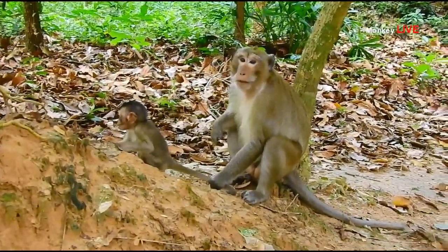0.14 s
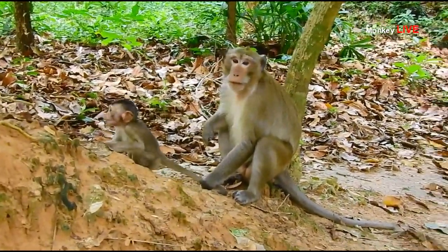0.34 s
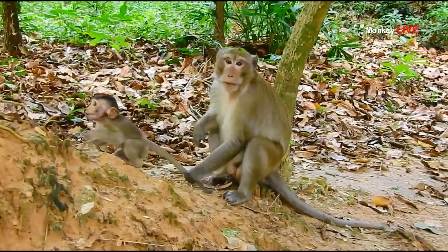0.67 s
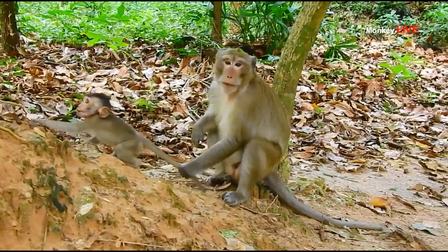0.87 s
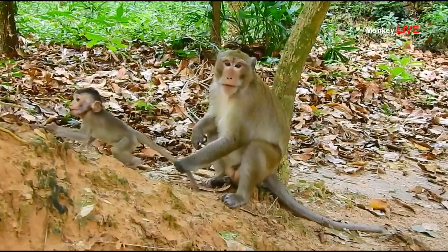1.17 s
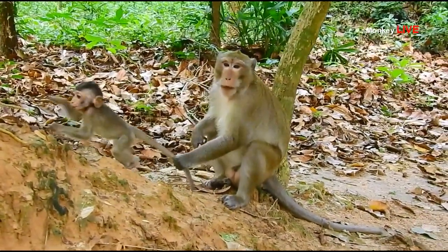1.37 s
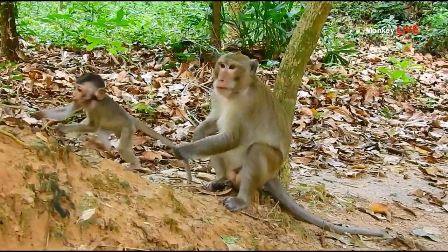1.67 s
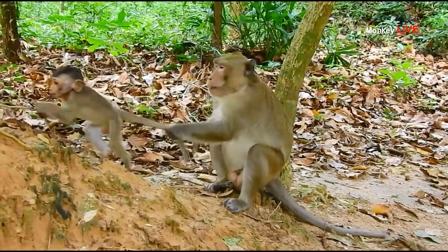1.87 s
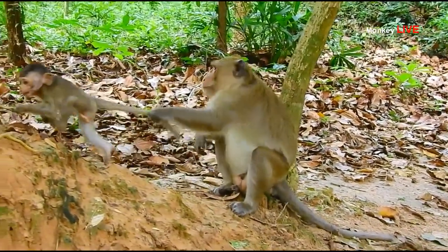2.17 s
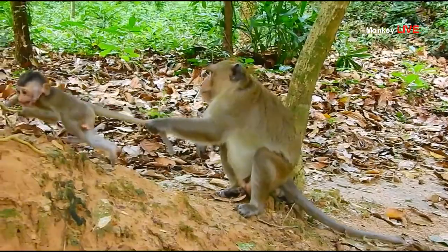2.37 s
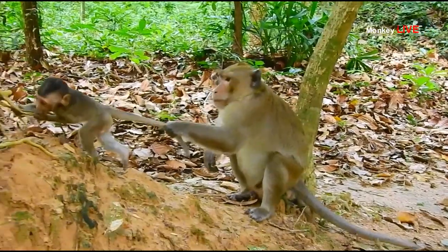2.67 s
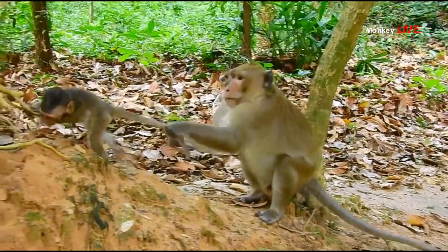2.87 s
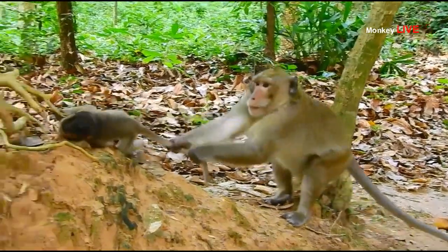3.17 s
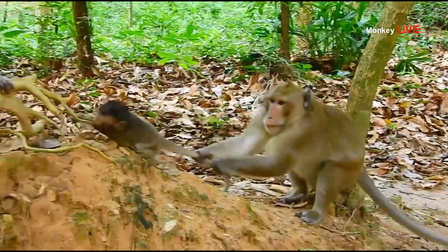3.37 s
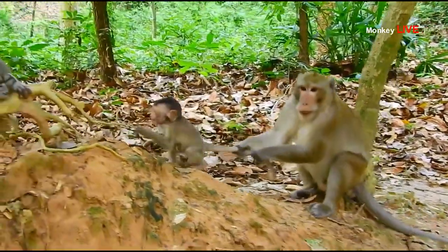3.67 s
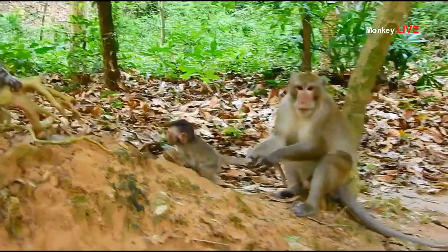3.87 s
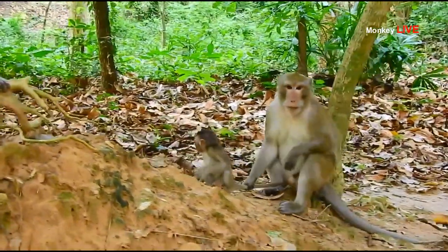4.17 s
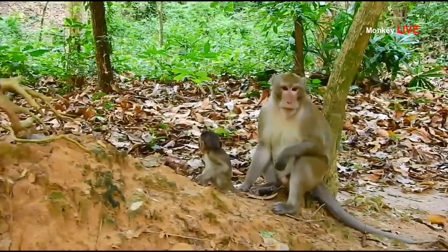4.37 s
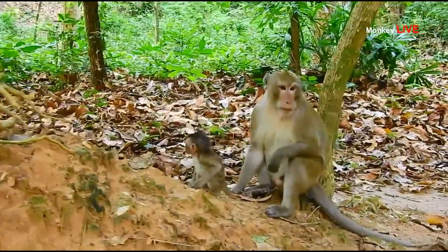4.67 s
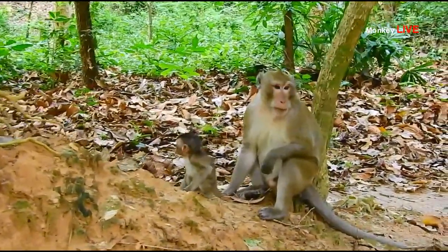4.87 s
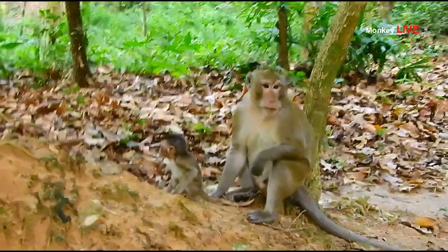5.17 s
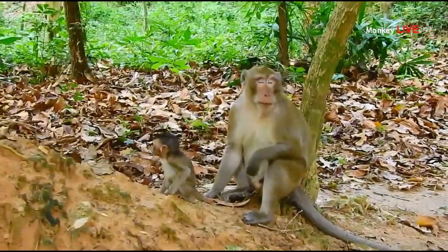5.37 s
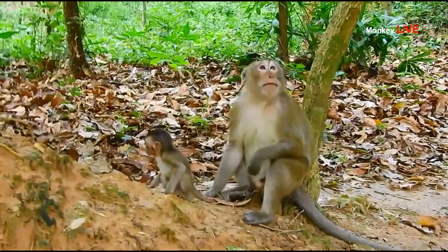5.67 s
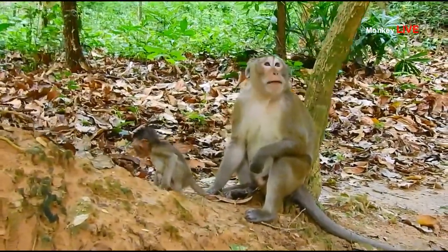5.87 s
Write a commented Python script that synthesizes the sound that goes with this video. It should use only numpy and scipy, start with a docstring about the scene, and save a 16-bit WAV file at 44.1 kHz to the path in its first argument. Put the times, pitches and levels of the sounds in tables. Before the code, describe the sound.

Close in a leafy forest, an infant monkey gives a short sinking coo and two longer climbing ones, then falls quiet. A far monkey call and thin bird notes pass. Two very brief, high shrieks break into rasp. Leaves rustle as it is dragged, with strained wavering whimpers. Scuffs, dull bumps and a quick dry branch rattle follow, then a last rising coo. Soft insect hiss and low road rumble continue throughout.

```python
"""On a leafy forest floor, close to the microphones, an infant macaque held by the tail coos, shrieks twice,
whimpers as it is pulled back and coos again: harmonic stacks, and high whistles that collapse into rasp.
Shaped noise makes the leaves rustle and snap and the ground bump; a dead branch rings in decaying modes.
Far off, gliding partials make another monkey's call and a bird's thin whistle.
Behind lie an insect hiss and a low road rumble of coloured noise, with a few rising engine drones."""
import sys
import numpy as np
from scipy import signal
from scipy.fft import rfft, irfft, next_fast_len
from scipy.io import wavfile

SR = 44100
rng = np.random.default_rng(int(sys.argv[2]) if len(sys.argv) > 2 else 0)


def master_out(mix):
    """Clip the mix to full scale and print it as 16-bit PCM to the path in sys.argv[1]."""
    frames = np.transpose(np.atleast_2d(mix))
    ceiling = np.clip(frames, -1, 1)
    pcm = np.round(ceiling * 32767).astype(np.int16)
    wavfile.write(sys.argv[1], SR, pcm)


N = 265923
TIME = np.arange(N) / SR

# Levels in the tables are those before the trims given in scene().

# close voice, clear coos: a short sinking one, then longer ones that catch and climb,
# two of them dropping at the end: (time [s], pitch [Hz], level [dB])
COO_CONTOURS = [
    [(0.062, 899, -53), (0.068, 888, -43), (0.078, 870, -39), (0.104, 856, -40.5), (0.114, 860, -55),
     (0.12, 867, -64)],
    [(0.153, 930, -50), (0.169, 917, -35), (0.205, 888, -42), (0.275, 899, -34.5), (0.339, 899.5, -33.5),
     (0.435, 930.5, -25), (0.503, 921.7, -26.5), (0.531, 892, -37), (0.548, 870, -41)],
    [(0.74, 817, -50), (0.748, 798, -39), (0.772, 849, -38.5), (0.818, 809, -38), (0.986, 892, -34),
     (1.13, 917, -30), (1.166, 940, -32), (1.214, 907, -30.5), (1.25, 867, -49)],
    [(5.632, 709, -46), (5.646, 718, -40.5), (5.66, 762, -39.5), (5.682, 708, -38), (5.706, 775, -42),
     (5.716, 755, -40.5), (5.814, 890, -34.5), (5.924, 956.5, -29), (6.03, 945, -32.5)],
]
# close voice, strained whimpers: (time [s], pitch [Hz], level [dB])
WHIMPER_CONTOURS = [
    [(3.61, 766, -41), (3.638, 774, -42), (3.648, 769, -45), (3.658, 740, -39), (3.678, 629, -50),
     (3.71, 640, -47)],
    [(3.785, 667.5, -46), (3.811, 742, -42), (3.865, 636, -43.5), (3.909, 838, -35), (3.951, 735, -39),
     (4.001, 752, -43.5), (4.061, 942, -31.5), (4.105, 717, -43), (4.135, 723, -45.5)],
]
# manner of each coo: (final drop in pitch [octaves], lift of the second partial [dB],
# lift of the high partials [dB], lag of the echo from the bank [s])
COO_MANNERS = [(0, -7.5, -6, 0.00124), (0.19, 1, -3, .00454), (0.193, -1, 5, .00117), (0, -3, -2, .00194)]
# manner of each run of whimpers, columns as for the coos:
# (final drop [octaves], second partial [dB], high partials [dB], echo lag [s])
WHIMPER_MANNERS = [(0, 3.5, 0, 0.00023), (.17, -0.81, 5.5, 0.001304)]
# three lowest partials against the cry; each is held to 0 dB at most before the lift of the second partial:
# (level at full voice [dB], gain per octave of pitch [dB])
COO_LOW_PARTIALS = [(0, -2), (-10, -12), (-9, 7)]
WHIMPER_LOW_PARTIALS = [(0.5, 23), (-11, -27.5), (-15, -7)]
# throat resonances on the higher partials: (frequency [Hz], gain [dB])
COO_RESONANCES = [(2800, 15), (3700, -36), (4600, -25.5), (5500, -11), (6400, -9), (7400, -24.5),
                  (8300, -26), (9200, -18.5), (10100, -32.5), (12000, -58), (15000, -55)]
WHIMPER_RESONANCES = [(2500, -9), (3600, -2), (4150, 7.5), (4600, 10), (4800, 9), (5300, -6), (7200, -21),
                      (9000, -15), (12000, -43), (15000, -47)]
# colour of the air leaking through the folds: (frequency [Hz], gain [dB])
BREATH_COLOUR = [(500, 8), (800, -4), (1500, 5), (2300, -3), (3200, -18), (4700, -12), (8000, -22),
                 (14000, -42)]
# shrieks: (start [s], attack [s], whistle length [s], collapse length [s], top pitch [Hz], whistle [dB],
# rasp [dB], level change at the collapse [dB], roughness [0-1], sputter [dB])
SHRIEK_EVENTS = [(2.374, 0.003, .046, .014, 7640, -13.5, -18.5, 1.5, 0.36, 6),
                 (2.688, 0.0099, .047, .032, 7850, -21.5, -27, -5.5, 0.24, -2.5)]
# colour of the rasp, one spectrum per shriek: (frequency [Hz], gain [dB])
RASP_COLOURS = [
    [(400, -56), (2300, -29), (2900, -8), (3400, -22), (4400, -18), (5100, -5), (7000, 0.5), (8300, 1.5),
     (9300, -12.5), (11200, -12.5), (12800, -39), (13900, -26), (15000, -62)],
    [(1000, -15.5), (2200, -15.5), (3400, 0), (4500, -2), (5600, 5.5), (7500, -11), (8400, -4), (9700, -4),
     (11200, -15), (12200, -32), (13500, -20), (15500, -44)],
]
# limbs dragged through the leaves: (time of the peak [s], level [dB], 60 dB decay [s])
LEAF_STROKES = [(3.174, -39, 0.48), (3.32, -39.5, 0.16), (3.388, -37.5, 0.38), (3.5, -42, .2),
                (3.552, -34.5, 1), (3.727, -26, 0.21), (3.817, -29.5, 0.15), (3.902, -36.5, 0.47),
                (4.066, -42, 0.72), (5.11, -43, 0.62)]
# colour of crushed leaves: (frequency [Hz], gain [dB])
LEAF_COLOUR = [(180, -59), (300, -11.5), (430, -12), (691, -11), (1150, -19), (1420, -13), (1880, -15),
               (5620, -0.5), (10500, -29.5), (15000, -51)]
# dry leaves and twigs snapping: (time [s], peak [dB], nominal pitch [Hz], 60 dB decay of the crackle [s])
LEAF_SNAPS = [(0.0387, -34.5, 5940, 0.00084), (0.732, -37.5, 6900, 0.0027), (1.424, -41.5, 5830, 0.018),
              (1.788, -38.5, 5270, 0.068), (2.039, -46, 6400, 0.011), (5.444, -38, 5100, 0.016),
              (5.466, -40, 5940, 0.022)]
# scuffs and bumps on the ground: (time [s], scuff [dB], 60 dB decay [s], thud [dB], centre [Hz])
GROUND_BUMPS = [(1.819, -33.5, 0.034, -50, 1500), (2.724, -33.5, 0.1, -51, 720),
                (2.745, -29.5, 0.043, -63, 710), (3.535, -36.5, 0.19, -43, 1090),
                (3.629, -30.5, 0.19, -33.5, 1350), (4.484, -32.5, 0.072, -44, 1580),
                (4.545, -38, 0.15, -43, 1420), (4.884, -33.5, 0.036, -40, 1070),
                (5.088, -28, 0.15, -49, 1110), (5.121, -35, 0.22, -56, 1390),
                (5.18, -33.5, 0.15, -60, 1220), (5.23, -36.5, 0.21, -57, 900),
                (5.432, -37.5, 0.19, -49, 1490), (5.709, -30.5, 0.19, -32, 1570),
                (5.943, -27.5, 0.17, -33, 805)]
# colour of a scuff: (multiple of its centre [ratio], gain [dB])
SCUFF_COLOUR = [(.15, -19), (.4, 3.5), (1, 6), (1.5, -1), (2.1, -6), (3.6, -5.5), (9, -41)]
# knocks and rattles of a dead branch: (time [s], level [dB])
BRANCH_KNOCKS = [(5.0834, -27), (5.0888, -25.5), (5.091, -21.5), (5.099, -22), (5.104, -23)]
# modes of the branch: (frequency [Hz], mean level [dB], 60 dB decay [s])
BRANCH_MODES = [(520, -20, 0.055), (760, -19, 0.021), (1030, -6, 0.028), (1310, -4, 0.022),
                (1600, -1, 0.022), (1860, -0.5, 0.022), (2230, -4, 0.015), (2640, -16, .02)]
# syllables of the far call: (start [s], length [s], first pitch [Hz], last pitch [Hz], starting level [dB])
FAR_SYLLABLES = [(1.575, 0.096, 401, 334, -45), (1.665, 0.156, 321.4, 342, -49.5)]
# colour of the far voice: (frequency [Hz], gain [dB])
FAR_RESONANCES = [(350, -2.5), (680, 1), (1000, -6), (1330, 0.5), (1700, -10), (2200, -27), (4000, -35)]
# faint bird notes: (start [s], length [s], first pitch [Hz], last pitch [Hz], starting level [dB])
BIRD_NOTES = [(1.995, 0.123, 2270, 2080, -50), (2.13, 0.24, 2290, 2100, -57)]
# colour of the insect hiss: (frequency [Hz], gain [dB])
INSECT_COLOUR = [(2800, -11), (3400, -6.5), (3750, 1), (4150, 6.5), (4600, -7), (5000, 4.5), (5500, 9.5),
                 (5850, -0.5), (6200, -4.5), (7200, -12), (10000, -15), (11500, -22), (13000, -32.5),
                 (15600, -33)]
# colour of the road rumble: (frequency [Hz], gain [dB])
ROAD_COLOUR = [(24, -13.5), (45, -6.5), (87, -1), (129, -2), (160, -9.5), (280, -21.5), (340, -27.5),
               (520, -26.5), (930, -26.5), (1700, -34), (2200, -32), (3000, -38), (4000, -59), (6600, -110)]
# swelling engine drones: (start [s], length [s], first pitch [Hz], last pitch [Hz], starting level [dB])
ENGINE_DRONES = [(5.2, 0.44, 102, 134.7, -34), (5.48, 0.83, 54.2, 61.4, -40), (5.935, .1, 166.2, 186, -28)]
# likeness of sound from all around at the two microphones: (frequency [Hz], left-right correlation [0-1])
STEREO_LIKENESS = [(60, 0.98), (100, 0.98), (170, 0.98), (280, 0.78), (900, 0.84), (2500, 0.66),
                   (4200, 0.56), (5500, 0.23), (7500, 0.017), (13000, 0.016)]

FULL_VOICE_HZ = 900
DROP_S, BANK_ECHO = 0.0137, 0.29   # time constant of the final drop; echo strength, overtones only
SHRIEK_START_HZ, COLLAPSE_HZ = 6400, 4870   # foot of the arch; where the pitch lands
COLLAPSE_ROUGH = 0.72   # roughness reached by the end of the collapse
ARCH_SHARE, WHISTLE_DIES_S = 0.85, 0.14   # share of the arch sung before the break; 60 dB decay after it
SPUTTER_PER_S, SPUTTER_S = 140, 0.028   # the folds catch in a few bursts before they hold
SCUFFLE_RISE_S = 0.15   # time a stroke takes to swell by 60 dB
NOTE_ATTACK, NOTE_SAG_DB = 0.16, 8   # share of a far note spent swelling, and again fading; its steady sinking
INSECT_DB, ROAD_DB = -46, -38   # rms of the part common to both microphones
FOREST_T60_S = 1
MIC_LAG_S = 0.00001
PEAK_LIMIT, CUTOFF_HZ = 0.85, 15700


def cries(calls, manners, partials, throat, jitter, shimmer, overtone_db, strain_db, hoarse_db):
    """Vocal folds give a harmonic stack: tight and bright at high pitch, slack and unsteady at low pitch."""
    out = np.zeros(N)
    for rows, (drop_octaves, second_db, bright_db, echo_s) in zip(calls, manners):
        span, gate, (hz, level_db) = phrase(rows, fade_s=0.0012)
        # where a drop is given, the folds go slack as the cry ends
        hz = hz * 2 ** (-drop_octaves * np.exp((TIME[span] - TIME[span][-1]) / DROP_S))
        size, tension = len(hz), hz / FULL_VOICE_HZ
        phase = cycle(hz * (1 + jitter / tension ** 4 * drift(111, size)))
        echo_phase = phase - 2 * np.pi * hz * echo_s
        partial_db = [level_db + np.minimum(db + octave_db * np.log2(tension), 0)
                      for db, octave_db in partials]
        partial_db[1] = partial_db[1] + second_db
        # the high partials grow with the third and pass the resonances of the throat
        high_db = partial_db[-1] + overtone_db + bright_db + strain_db * np.log2(tension)
        for k in range(1, 15):
            db = partial_db[k - 1] if k <= len(partial_db) else high_db + at_hz(throat, k * hz)
            wave = np.sin(k * phase) + (k > 1) * BANK_ECHO * np.sin(k * echo_phase)
            flicker_db = shimmer * np.sqrt(k - 1) * drift(33, size)
            out[span] += gate * np.sqrt(2) * from_db(db + flicker_db) * wave
        # air leaks through the folds once a cycle
        leak = from_db(partial_db[1] + hoarse_db) * (1 + np.cos(phase))
        out[span] += gate * leak * noise(BREATH_COLOUR, size)
    return out


def shrieks(wobble, flutter, octave_db):
    """A very high whistle sputters on, arches up and over, then collapses into chaotic flutter and rasp."""
    out = np.zeros(N)
    for row, colour in zip(SHRIEK_EVENTS, RASP_COLOURS):
        (start_s, attack_s, arch_s, collapse_s, top_hz,
         whistle_db, rasp_db, collapse_db, roughness, sputter_db) = row
        span, t = stretch(start_s, arch_s + collapse_s)
        size, broken_s = len(t), np.maximum(t - arch_s, 0)
        arch = np.sin(np.pi * ARCH_SHARE * np.minimum(t / arch_s, 1))
        collapse = np.sin(np.pi / 2 * broken_s / collapse_s)
        arch_hz = SHRIEK_START_HZ + (top_hz - SHRIEK_START_HZ) * arch
        hz = arch_hz * (1 - collapse) + COLLAPSE_HZ * collapse
        rough = roughness + (COLLAPSE_ROUGH - roughness) * collapse
        catches = (np.cos(2 * np.pi * SPUTTER_PER_S * t) - 0.5) / 2
        sputter = sputter_db * np.maximum(1 - (t / SPUTTER_S) ** 2, 0) * catches
        gate = np.minimum(t / attack_s, 1) * np.minimum((t[-1] - t) / 0.0023, 1)
        gain = gate * from_db(sputter + collapse_db * collapse)
        phase = cycle(hz * (1 + wobble * rough * drift(740, size)))
        beat = rms_one(from_db(flutter * rough * np.tanh(drift(460, size))))
        whistle = np.sin(phase) + from_db(octave_db) * np.sin(2 * phase)
        whistle *= np.sqrt(2) * from_db(whistle_db - 60 * broken_s / WHISTLE_DIES_S)
        rasp = from_db(rasp_db) * noise(colour, size)
        out[span] += gain * (beat * whistle + np.sqrt(beat) * rasp)
    return out


def scuffle(grain_db, level_db):
    """Crushed leaves crackle in clumps of tiny grains, under strokes that swell and die away."""
    power = np.zeros(N)
    for s, db, t60 in LEAF_STROKES:
        fall_db = 60 * np.maximum((s - TIME) / SCUFFLE_RISE_S, (TIME - s) / t60)
        power += from_db(db - fall_db) ** 2
    grains = rms_one(noise(LEAF_COLOUR, N) * from_db(grain_db * drift(180, N)))
    return from_db(level_db) * np.sqrt(power) * grains


def snaps(crackle, level_db):
    """A brittle leaf gives one sharp crack, then a short crackle, around a pitch of its own."""
    out, t = np.zeros(N), TIME[:SR // 5]
    for s, db, hz, t60 in LEAF_SNAPS:
        force = (t == 0) + crackle * rng.standard_normal(len(t)) * from_db(-60 * t / t60)
        band = signal.butter(3, [hz * 0.8, hz * 1.127], "band", fs=SR, output="sos")
        tick = signal.sosfilt(band, force)
        out[int(s * SR):int(s * SR) + len(t)] += from_db(db + level_db) * tick / np.abs(tick).max()
    return out


def bumps(level_db, thud_db):
    """Limbs scuff the earth, each time with a colour of its own and a dull thud underneath."""
    out, thud = np.zeros(N), [(90, 0), (180, 23), (400, -59), (2000, -52)]   # (frequency [Hz], gain [dB])
    for s, db, t60, low_db, hz in GROUND_BUMPS:
        scuff = [(hz * multiple, gain_db) for multiple, gain_db in SCUFF_COLOUR]
        out += from_db(db + level_db) * burst(s, t60, 0.00017, scuff)
        out += from_db(low_db + thud_db) * burst(s, 0.039, 0.0035, thud)
    return out


def burst(s, t60, attack_s, colour):
    """A contact: noise that swells quickly and dies away."""
    out, start = np.zeros(N), int(s * SR)
    t = TIME[:min(SR // 2, N - start)]
    envelope = (1 - np.exp(-t / attack_s)) * from_db(-60 * t / max(t60, 0.01))
    out[start:start + len(t)] = noise(colour, len(t)) * envelope
    return out


def branch(level_db):
    """Every knock rings each mode of the dead branch with a strength of its own."""
    out, t = np.zeros(N), TIME[:SR // 5]
    for s, db in BRANCH_KNOCKS:
        ring = np.zeros(len(t))
        for hz, mode_db, t60 in BRANCH_MODES:
            strength = from_db(mode_db + rng.normal(0, 3.8) - 60 * t / t60) * rng.choice([-1, 1])
            ring += strength * np.sin(2 * np.pi * hz * t)
        out[int(s * SR):int(s * SR) + len(t)] += from_db(db + level_db) * ring * (1 - np.exp(-t / 0.00028))
    return out


def far_call(jitter, shimmer):
    """A lower, softer voice among the trees: eight partials, each wavering in level."""
    out = np.zeros(N)
    for span, hz, phase, gain in notes(FAR_SYLLABLES, jitter, waver_hz=80):
        for k in range(1, 9):
            partial_db = at_hz(FAR_RESONANCES, k * hz) + shimmer * drift(25, len(hz))
            out[span] += gain * from_db(partial_db) * np.sin(k * phase)
    return out


def bird(waver):
    """Thin, wavering, falling notes from the canopy: one sine each."""
    out = np.zeros(N)
    for span, _, phase, gain in notes(BIRD_NOTES, waver, waver_hz=60):
        out[span] += gain * np.sin(phase)
    return out


def insects(flicker_db):
    """A hiss from all around: coloured noise whose level flickers slightly."""
    return from_db(INSECT_DB + flicker_db * drift(15, N)) * wide_noise(INSECT_COLOUR)


def road():
    """The low rumble of a distant road: steady coloured noise."""
    return from_db(ROAD_DB) * wide_noise(ROAD_COLOUR)


def engine(waver):
    """Low tones of a far engine drone upward."""
    out = np.zeros(N)
    for span, _, phase, gain in notes(ENGINE_DRONES, waver, waver_hz=25):
        out[span] += np.sqrt(2) * gain * np.sin(phase)
    return out


def forest(x, near_db, near_t60, far_db):
    """Direct sound, quick scatter from the bank and the leaves, then a thin tail from the trunks."""
    t = TIME[:SR]
    near = rms_one(from_db(-60 * t / near_t60) * (t > 0.003))
    far = rms_one(from_db(-60 * t / FOREST_T60_S) * (t > 0.03))
    f = np.fft.rfftfreq(SR, 1 / SR)
    alike = np.clip(at_hz(STEREO_LIKENESS, f), 0, 1)
    colour = from_db(at_hz([(6000, -0.5), (7800, 5.0), (8600, -3.0), (15000, 0)], f))   # ([Hz], [dB])
    chance = rfft(rng.standard_normal((2, SR)))
    mid, side = irfft(chance * np.sqrt([1 + alike, 1 - alike]) * colour, SR)
    fading = from_db(near_db) * near + from_db(far_db) * far
    echoes = np.array([mid + side, mid - side]) * fading / np.sqrt(2 * SR)
    return x + signal.fftconvolve(x[None], echoes, axes=1)[:, :N]


def from_left(pair, pan_db):
    """The sound reaches the right microphone a little later and weaker."""
    delay = np.exp(-2j * np.pi * np.fft.rfftfreq(N, 1 / SR) * MIC_LAG_S)
    right = irfft(rfft(pair[1]) * delay, N)
    return np.array([pair[0] * from_db(pan_db / 2), right * from_db(-pan_db / 2)])


def wide_noise(spectrum):
    """Sound from all around: alike at both microphones in the bass, less so in the treble."""
    alike = np.clip(at_hz(STEREO_LIKENESS, np.fft.rfftfreq(N, 1 / SR)), 0, 1)
    side = irfft(rfft(noise(spectrum, N)) * np.sqrt((1 - alike) / (1 + alike)), N)
    return noise(spectrum, N) + side * np.array([[1], [-1]])


def notes(rows, waver, waver_hz):
    """Each note glides in pitch, swells, sinks and fades: its samples, pitch, phase and gain."""
    for start_s, length_s, first_hz, last_hz, db in rows:
        span, t = stretch(start_s, length_s)
        part = t / length_s
        hz = first_hz + (last_hz - first_hz) * part
        gate = np.sin(np.pi / 2 * np.clip(np.minimum(part, 1 - part) / NOTE_ATTACK, 0, 1))
        phase = cycle(hz * (1 + waver * np.tanh(drift(waver_hz, len(t)))))
        yield span, hz, phase, gate * from_db(db - NOTE_SAG_DB * part)


def phrase(rows, fade_s):
    """The samples that a table spans, a soft gate over them, and its columns."""
    s, *columns = np.transpose(rows)
    span = slice(max(int(s[0] * SR), 0), min(int(s[-1] * SR), N))
    t = TIME[span]
    gate = np.sin(np.pi / 2 * np.clip(np.minimum(t - s[0], s[-1] - t) / fade_s, 0, 1)) ** 2
    return span, gate, [np.interp(t, s, c) for c in columns]


def stretch(start_s, length_s):
    """The samples that an event spans, and the time since its start."""
    span = slice(int(start_s * SR), min(int((start_s + length_s) * SR), N))
    return span, TIME[:span.stop - span.start]


def cycle(hz):
    """Phase of an oscillator that follows a pitch."""
    return 2 * np.pi * np.cumsum(hz) / SR


def noise(spectrum, size):
    """Noise of a given colour, falling away below its lowest point; rms 1."""
    length = next_fast_len(size, True)
    f = np.fft.rfftfreq(length, 1 / SR)
    gain = from_db(at_hz(spectrum, f)) * np.minimum(f / spectrum[0][0], 1) ** 4
    return rms_one(irfft(rfft(rng.standard_normal(length)) * gain, length)[:size])


def drift(rate_hz, size):
    """Smooth chance: noise softened above a rate, made with spread 1."""
    f = np.fft.rfftfreq(next_fast_len(size + 4096, True), 1 / SR)
    chance = rfft(rng.standard_normal(2 * len(f) - 2))
    return rms_one(irfft(chance / (1 + (f / rate_hz) ** 2)))[:size]


def at_hz(points, hz):
    """Read a spectrum on a log-frequency axis."""
    f, value = np.transpose(points)
    return np.interp(np.log(np.maximum(hz, 1)), np.log(f), value)


def rms_one(x):
    """Scale to unit rms."""
    return x / np.sqrt(np.mean(x ** 2) + 1e-20)


def from_db(db):
    """Decibels to gain."""
    return 10 ** (np.asarray(db) / 20)


def scene():
    """The infant close to the microphones, the litter around it, the forest and road beyond."""
    coos = cries(COO_CONTOURS, COO_MANNERS, COO_LOW_PARTIALS, COO_RESONANCES, jitter=0.0019,
                 shimmer=1.26, overtone_db=-1.5, strain_db=13, hoarse_db=-20.5)
    whimpers = cries(WHIMPER_CONTOURS, WHIMPER_MANNERS, WHIMPER_LOW_PARTIALS, WHIMPER_RESONANCES,
                     jitter=0.00587, shimmer=1.7, overtone_db=-7.5, strain_db=32, hoarse_db=-7.5)
    voice = forest(coos + whimpers, near_db=-8.5, near_t60=0.15, far_db=-31)
    screams = shrieks(wobble=0.041, flutter=9.4, octave_db=-58)
    screams = forest(screams, near_db=-5, near_t60=0.17, far_db=-26.0)

    litter = scuffle(grain_db=3.0, level_db=-1.5) + snaps(crackle=0.28, level_db=11.5)
    litter += bumps(level_db=-4.5, thud_db=6.5) + branch(level_db=-4.5)
    ground = forest(litter, near_db=-5.5, near_t60=0.057, far_db=-10.5)

    distant = far_call(jitter=0.023, shimmer=5.4) + bird(waver=0.0104)
    distant = forest(distant, near_db=-6.0, near_t60=0.22, far_db=-16.0)
    background = insects(flicker_db=0.56) + road() + engine(waver=0.042)
    return from_left(voice + screams, pan_db=0.16) + ground + distant + background


def record(dry):
    """The very highest peaks are rounded, the top is cut steeply."""
    rounded = dry / (1 + (dry / PEAK_LIMIT) ** 8) ** (1 / 8)
    return signal.sosfilt(signal.ellip(10, 0.1, 90, CUTOFF_HZ, fs=SR, output="sos"), rounded)


dry = scene()
out = record(dry)
master_out(out)
```